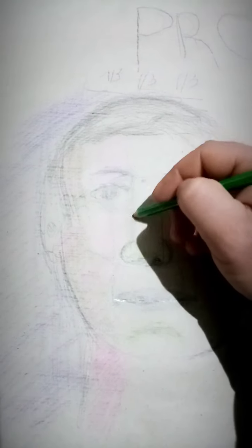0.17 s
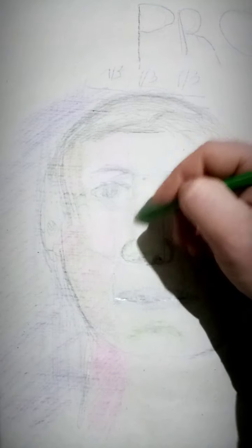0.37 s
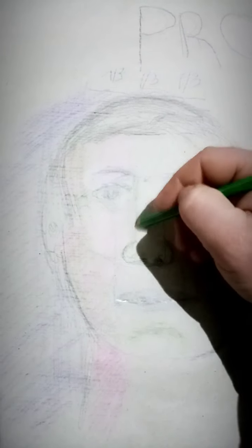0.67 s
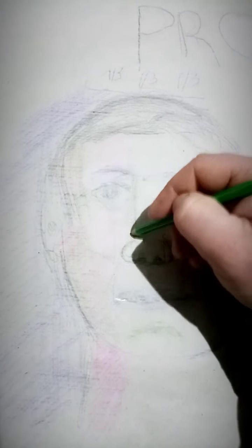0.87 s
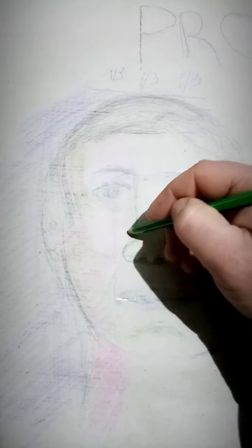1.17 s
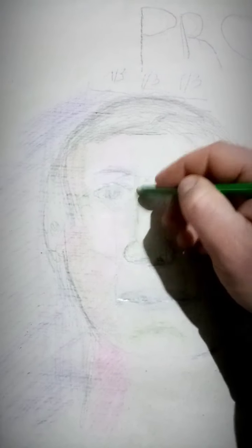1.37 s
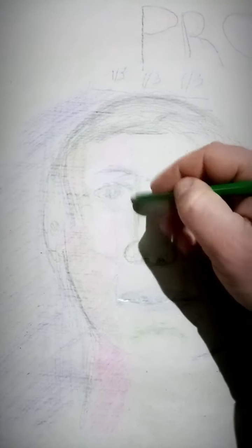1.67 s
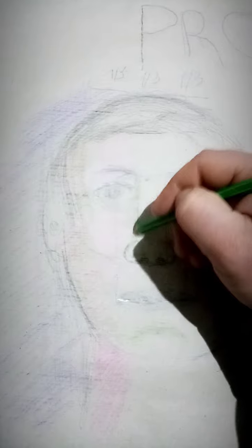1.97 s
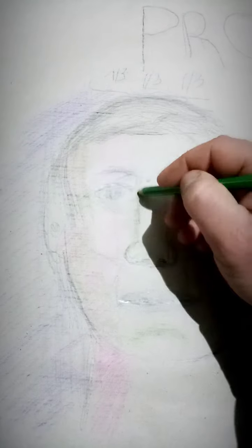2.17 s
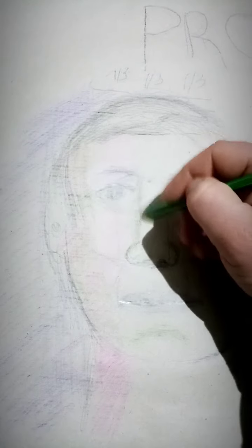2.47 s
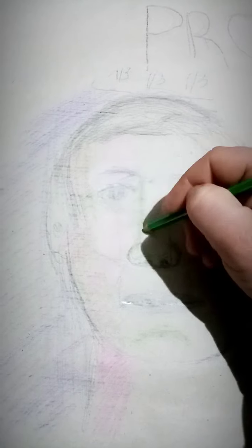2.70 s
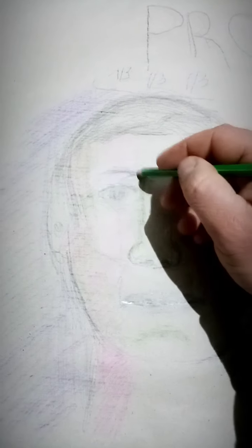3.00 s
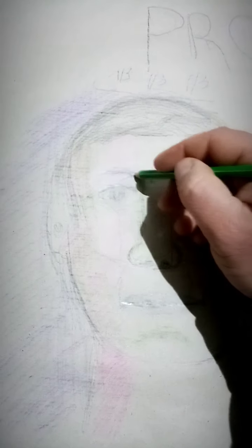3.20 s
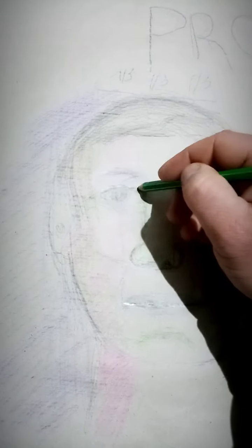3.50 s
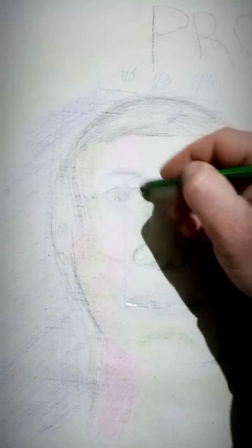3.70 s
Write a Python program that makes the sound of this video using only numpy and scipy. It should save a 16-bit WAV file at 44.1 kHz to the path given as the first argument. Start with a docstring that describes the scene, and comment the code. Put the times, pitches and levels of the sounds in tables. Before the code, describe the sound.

A coloured pencil shades on paper with faint, quick, scratchy back-and-forth strokes.

```python
"""In a quiet room, a coloured pencil shades on paper, about eight strokes a second, then more lightly.
The lead scrapes over the paper's tiny bumps: a grainy hiss, a rasp from the sheet and a low drumming
of the board below. Now and then the tip catches and ticks, the lead digs in and shakes the sheet,
or the hand leans in and thumps the board. The sound reaches the left microphone first."""
import sys
import numpy as np
from scipy import signal
from scipy.fft import rfft, irfft, next_fast_len
from scipy.io import wavfile
from scipy.ndimage import map_coordinates

SR = 44100
rng = np.random.default_rng(int(sys.argv[2]) if len(sys.argv) > 2 else 0)


def master_out(mix):
    """Clip the mix to full scale and print it as 16-bit PCM to the path in sys.argv[1]."""
    frames = np.transpose(np.atleast_2d(mix))
    ceiling = np.clip(frames, -1, 1)
    pcm = np.round(ceiling * 32767).astype(np.int16)
    wavfile.write(sys.argv[1], SR, pcm)


N = 169785

# pencil strokes: start t/s, fastest t/s, end t/s, then relative level/dB of hiss, sheet and board
PENCIL_STROKES = [ (-.06, -0.028, 0.1, -61.5, -67.5, -91), (0.051, 0.124, 0.19, -49, -60, -48),
                  (0.191, 0.235, 0.3, -49, -59, -48), (0.304, 0.373, 0.44, -47, -57, -42.5),
                  (0.438, 0.488, 0.55, -48.5, -54.5, -48.5), (0.539, 0.624, 0.69, -47, -57.5, -39),
                  (0.691, 0.733, .8, -49, -57.5, -46), (0.778, 0.859, 0.91, -46, -55.5, -45),
                  (0.904, 0.962, 1.02, -52, -60.5, -52), (1.006, 1.079, 1.137, -47.5, -59, -42),
                  (1.123, 1.187, 1.209, -53.5, -67.5, -55), (1.213, 1.242, 1.334, -64, -94, -68),
                  (1.297, 1.381, 1.445, -49, -60, -48), (1.444, 1.525, 1.585, -48.5, -59.5, -45),
                  (1.593, 1.657, 1.718, -48.5, -56, -53), (1.714, 1.745, 1.817, -47.5, -52.5, -46),
                  (1.816, 1.86, 1.956, -50, -57, -45), (1.93, 1.947, 2.028, -50, -56.5, -47.5),
                  (2.025, 2.071, 2.18, -50, -58, -47.5), (2.165, 2.21, 2.295, -59.5, -78, -64),
                  (2.301, 2.381, 2.472, -49, -60, -45.5), (2.463, 2.523, 2.575, -46.5, -57, -44),
                  (2.577, 2.665, 2.715, -46, -51, -43.5), (2.695, 2.844, 2.9, -49, -56.5, -52.5),
                  (2.873, 2.928, 3.02, -61, -72.5, -70), (3.025, 3.077, 3.13, -56, -72.5, -61),
                  (3.154, 3.177, 3.286, -54, -71, -56.5), (3.273, 3.294, 3.367, -55, -69, -57),
                  (3.367, 3.417, 3.49, -57, -74, -57.5), (3.45, 3.526, 3.55, -65.5, -74.5, -59.5),
                  (3.568, 3.612, 3.7, -59, -67, -62), (3.668, 3.701, 3.756, -56.5, -66, -55.5),
                  (3.771, 3.822, 3.87, -53.5, -66, -55.5)]


def amp(db):
    """Turn decibels into a gain."""
    return 10 ** (np.asarray(db) / 20)


def unit(x):
    """Scale a signal to an average strength (rms) of 1."""
    return x / np.sqrt(np.mean(x ** 2) + 1e-20)


def gains(points, hz):
    """Read gains off a curve of f/Hz, level/dB points, joined along a log frequency axis."""
    f, db = np.transpose(points)
    return amp(np.interp(np.log(hz + 1), np.log(f + 1), db))


def filtered(x, response):
    """Multiply each frequency in x by response(hz)."""
    size = next_fast_len(N + 8192)
    return irfft(rfft(x, size) * response(np.fft.rfftfreq(size, 1 / SR)), size)[..., :N]


def ring(force, spectrum):
    """A force shakes an object; the spectrum sets its tone, not its overall level."""
    size = 8192
    cepstrum = irfft(np.log(gains(spectrum, np.fft.rfftfreq(size, 1 / SR))))
    cepstrum[1:size // 2] *= 2  # fold it so that the ringing comes after the push
    cepstrum[size // 2 + 1:] = 0
    body = irfft(np.exp(rfft(cepstrum)))
    return signal.fftconvolve(force, body / np.linalg.norm(body))[:N]


def taps(hits, spectrum):
    """Each hit gives an object one sharp push."""
    force = np.zeros(N)
    for start, db in hits:
        force[round(start * SR)] = amp(db)
    return ring(force, spectrum)


def wobble(per_s):
    """A smooth curve through per_s random values a second."""
    return map_coordinates(rng.standard_normal(8192), [np.arange(N) * per_s / SR], mode="wrap")


def room_air():
    """The still air of the room is a soft, low noise."""
    air_tone = [(25, -24.5), (60, 5.5), (110, 12), (200, -5), (400, -7.5), (1000, -15), (3000, -14.5),
                (9000, -23), (12000, -31), (15500, -32)]  # the air's spectrum: f/Hz, level/dB
    return unit(filtered(rng.standard_normal((2, N)), lambda hz: gains(air_tone, hz)))


def room(x):
    """Sound arrives left first; desk and walls add short echoes that change as the hand moves."""
    echo_tone = [(100, -20), (300, -7), (700, -3), (1500, 4), (5000, 2.5), (15000, 5)]  # echoes compared with the direct sound: f/Hz, level/dB
    right_lag_s, fade_60db_s = .00116, .04
    t, echo = np.arange(SR // 8) / SR, np.zeros((2, N))
    centres, step = np.linspace(0, N, 64, retstep=True)
    for centre in centres:  # each overlapping slice gets its own random echoes
        a, b = int(max(centre - step, 0)), int(min(centre + step, N))
        fade = np.cos(np.pi / 2 * (np.arange(a, b) - centre) / step)
        tail = rng.standard_normal((2, len(t))) * amp(-60 * t / fade_60db_s)
        tail /= np.linalg.norm(tail[0])
        part = signal.fftconvolve(x[None, a:b] * fade, tail, axes=1)[:, :N - a]
        echo[:, a:a + part.shape[1]] += part
    direct = filtered(x, lambda hz: np.exp(-2j * np.pi * hz * np.array([[0], [right_lag_s]])))
    return direct + filtered(echo, lambda hz: gains(echo_tone, hz))


def hand_thumps():
    """The hand leans in and thumps the board."""
    thumps = [(.113, -16), (.858, -19), (1.505, -15), (1.738, -12.5), (2.385, -9.5), (2.516, -17),
              (3.062, -19.5)]  # pushes on the board: t/s, level/dB
    thump_tone = [(30, -32), (70, -22), (100, 2.5), (122, -2.5), (150, -6), (200, -18.5), (300, -20.5),
                  (500, -53)]  # the thumped board's spectrum: f/Hz, level/dB
    return taps(thumps, thump_tone)


def lead_digs():
    """The lead digs in and shakes the sheet with a short burst of force."""
    digs = [(.03, -55), (0.132, -44.5), (0.157, -46), (0.619, -48), (.866, -48), (1.365, -47.5),
            (1.509, -52), (1.53, -49.5), (1.655, -46), (1.753, -44), (2.385, -40.5), (2.422, -40.5),
            (2.521, -43.5), (2.658, -42), (2.675, -43), (2.848, -52), (3.672, -47)]  # bursts of force: t/s, level/dB
    dig_tone = [(80, -8.5), (160, 5), (300, 11), (440, 1), (620, 0), (850, 2.5), (1250, -13.5), (1600, -7),
                (2300, -14), (3500, -18), (7000, -20), (12000, -33)]  # the shaken sheet's spectrum: f/Hz, level/dB
    decay_s = .0041
    t, force = np.arange(SR // 30) / SR, np.zeros(N + SR)
    for start, db in digs:
        burst = amp(db) * np.exp(-t / decay_s) * rng.standard_normal(len(t))
        force[round(start * SR):][:len(t)] += burst
    return ring(force[:N], dig_tone)


def tip_ticks():
    """The tip catches on the paper and ticks."""
    catches = [(.139, -29), (1.095, -29), (1.3877, -18), (2.238, -36), (2.4225, -27), (2.4295, -24),
               (2.432, -26), (2.515, -26), (2.8153, -21), (2.851, -29), (3.382, -39), (3.6715, -27)]  # catches of the tip: t/s, level/dB
    tick_tone = [(100, -16), (650, -7), (1100, -13), (1800, -9), (2500, -12), (4300, 0), (6500, .5),
                 (9000, -4), (12000, -16), (15000, -15)]  # a tick's spectrum: f/Hz, level/dB
    return taps(catches, tick_tone)


def strokes(levels_db, power, lag_s=0):
    """Each stroke speeds up, then slows to turn; loudness follows speed raised to a power."""
    turn_s = .0097  # the lead still rubs as it turns
    t, energy = np.arange(N) / SR - lag_s, np.zeros(N)
    for (start, fastest, end, *_), db in zip(PENCIL_STROKES, levels_db):
        span = [start - turn_s, fastest, end + turn_s]
        on = (t > span[0]) & (t < span[2])
        speed = np.sin(np.pi * np.interp(t[on], span, [0, .5, 1]))
        energy[on] += (amp(db) * np.abs(speed) ** power) ** 2
    return np.sqrt(energy)


def slips(per_s, spread_db):
    """The lead makes tiny slips over paper fibres, random in time and size."""
    hits = (rng.random(N) < per_s / SR) * rng.choice([-1, 1], N)
    sizes = amp(spread_db * np.clip(rng.standard_normal(N), -2, 2))
    return unit(hits * sizes)


def board_drumming(strength):
    """The slips drum on the board under the paper."""
    board_tone = [(25, -28.5), (48, -35.5), (65, -24), (88, -6), (115, -0.5), (140, -12), (180, -13.5),
                  (230, -21), (320, -21.5), (500, -54)]  # the board's spectrum: f/Hz, level/dB
    return ring(slips(per_s=900, spread_db=3) * strength, board_tone)


def sheet_rasp(strength):
    """The slips make the sheet rasp."""
    sheet_tone = [(100, -18), (200, 0.5), (300, 7), (420, 0), (620, 3.5), (800, -4.5), (1000, -10),
                  (1300, -20), (1650, -17), (2300, -14), (4000, -41.5)]  # the sheet's spectrum: f/Hz, level/dB
    return ring(slips(per_s=1100, spread_db=4) * strength, sheet_tone)


def pencil_ring(strength):
    """The pencil itself rings: a narrow band of noise around a high, drifting pitch."""
    pitch_hz, width_hz, drift_hz = 6050, 520, 280
    phase = 2 * np.pi * np.cumsum(pitch_hz + drift_hz * wobble(12)) / SR
    return unit(wobble(2 * width_hz) * np.cos(phase) + wobble(2 * width_hz) * np.sin(phase)) * strength


def grit_fizz(strength):
    """The finest grit fizzes at full speed."""
    fizz_tone = [(2000, -24), (5000, -16), (9500, 4.5), (11300, -12), (13300, -16), (14800, 4.5),
                 (15600, -6.5)]  # the grit's spectrum: f/Hz, level/dB
    return ring(slips(per_s=7000, spread_db=3) * strength, fizz_tone)


def lead_hiss(strength):
    """Thousands of slips a second blur into a hiss."""
    hiss_tone = [(300, -34.5), (1300, -13), (2300, -21.5), (2950, -2.5), (3700, -6.5), (5200, -0.5),
                 (6200, -5), (7000, -3), (8500, -9), (9500, -4), (10400, -11.5), (11300, -23),
                 (13000, -24.5), (13800, -32), (14700, -8.5), (15600, -9.5)]  # the scraping lead's spectrum: f/Hz, level/dB
    return ring(slips(per_s=9000, spread_db=2.5) * strength, hiss_tone)


def pencil():
    """One back-and-forth motion drives the lead, the sheet and the board."""
    hiss_db, sheet_db, board_db = np.transpose(PENCIL_STROKES)[3:]
    grip = amp(1.3 * wobble(400) + .6 * wobble(60))  # the lead grips the paper unevenly
    scrape = grip * strokes(hiss_db, power=2.1)
    hiss = amp(-3.5) * lead_hiss(scrape)
    fizz = amp(-14) * grit_fizz(grip * strokes(hiss_db, power=5))
    ringing = amp(-11.5) * pencil_ring(scrape)
    rasp = sheet_rasp(grip * strokes(sheet_db, power=3))
    drumming = amp(1.5) * board_drumming(strokes(board_db, power=1.87, lag_s=.0055))
    return hiss + fizz + ringing + rasp + drumming


def scene():
    """Shading, ticks, thumps and digs sound over the still air of the room."""
    return amp(-65) * room_air() + room(pencil() + tip_ticks() + hand_thumps() + lead_digs())


def record(dry):
    """The left microphone is weaker and duller; both sides lose the very highest treble."""
    left_tone = [(100, -4.5), (300, -8), (700, -1), (1500, -2), (3000, -5.5), (4500, -3), (5300, -3),
                 (6500, -1), (9000, -0.5), (10500, -9), (13000, 0.5), (15000, -20)]  # left microphone compared with the right: f/Hz, level/dB
    top_hz = 15700
    return filtered(dry, lambda hz: np.array([gains(left_tone, hz), np.ones_like(hz)]) * (hz < top_hz))


dry = scene()
out = record(dry)
master_out(out)
```